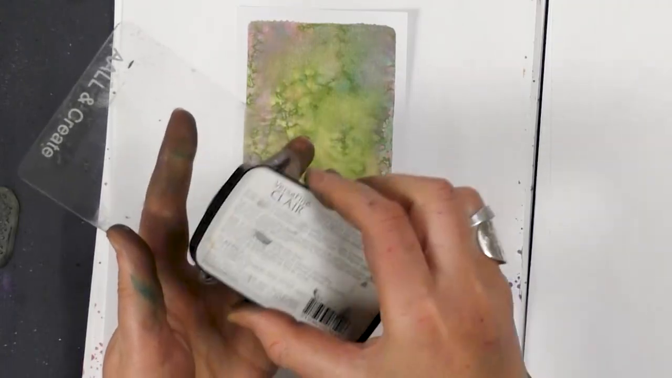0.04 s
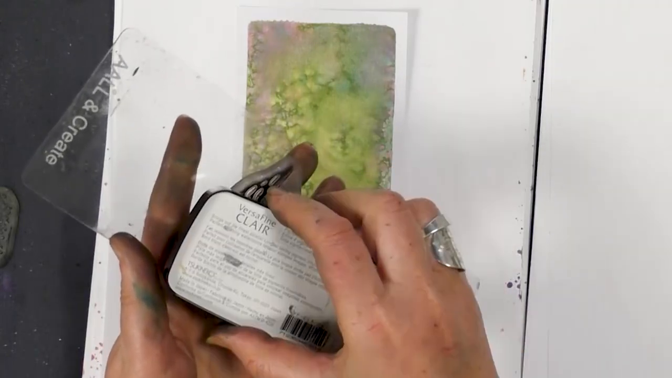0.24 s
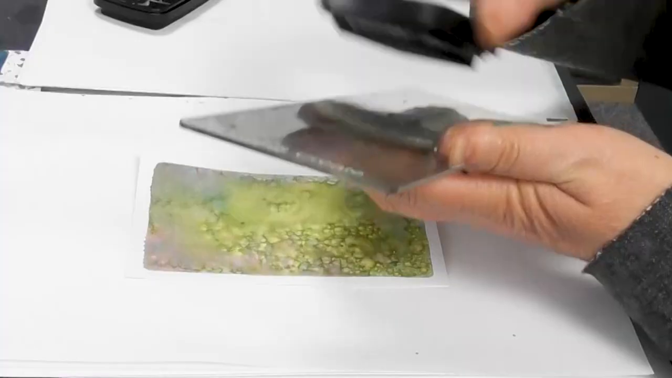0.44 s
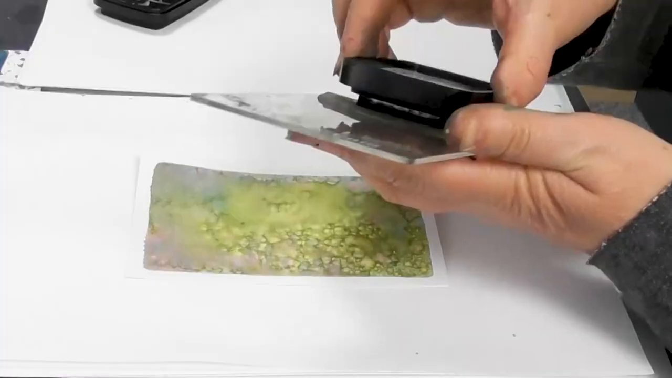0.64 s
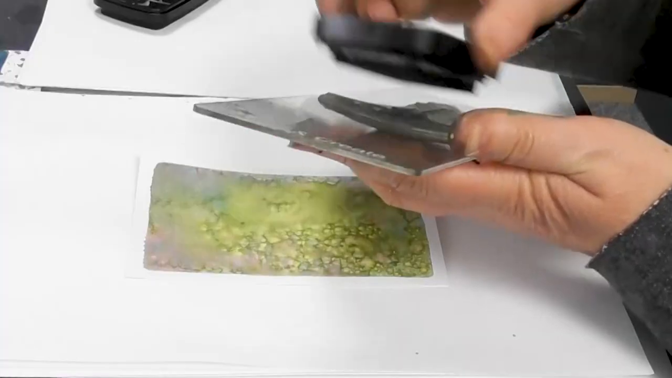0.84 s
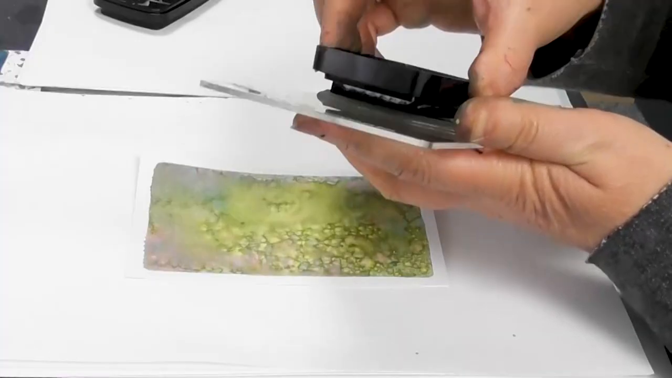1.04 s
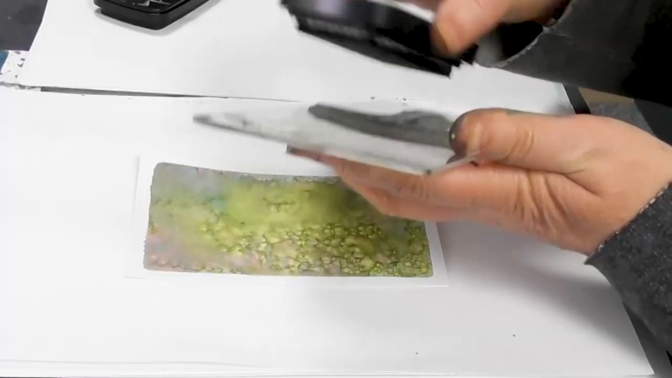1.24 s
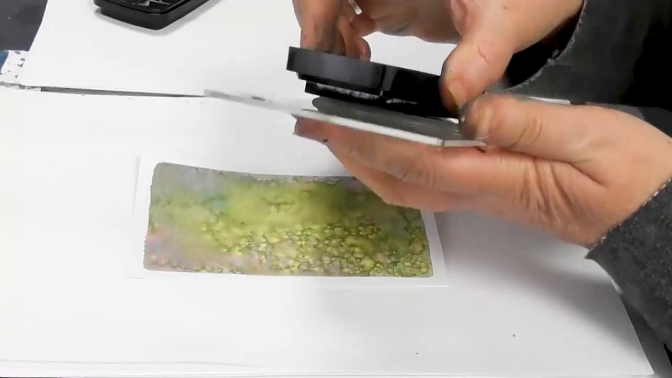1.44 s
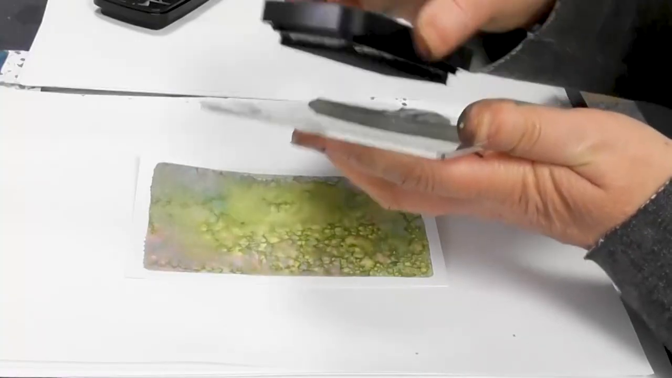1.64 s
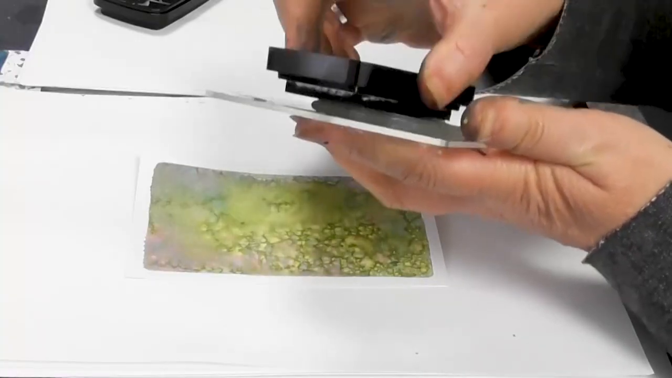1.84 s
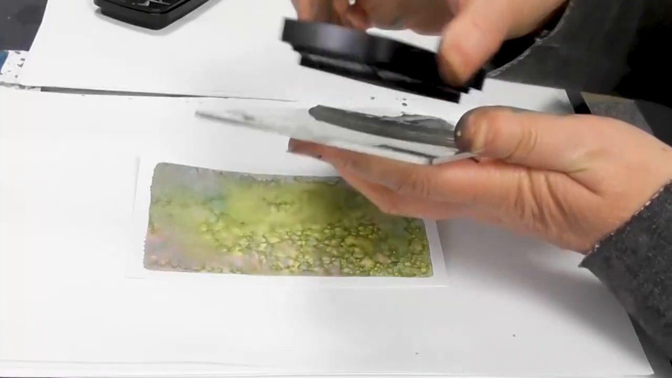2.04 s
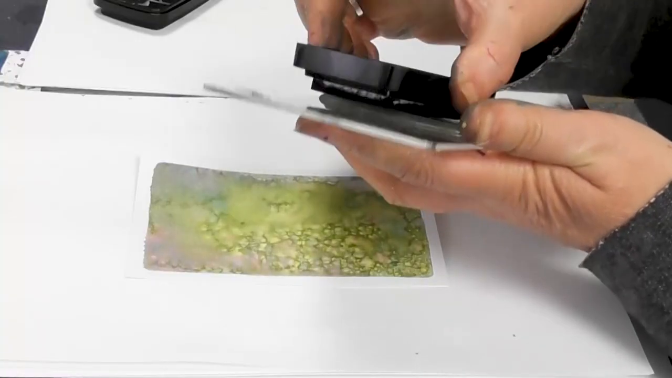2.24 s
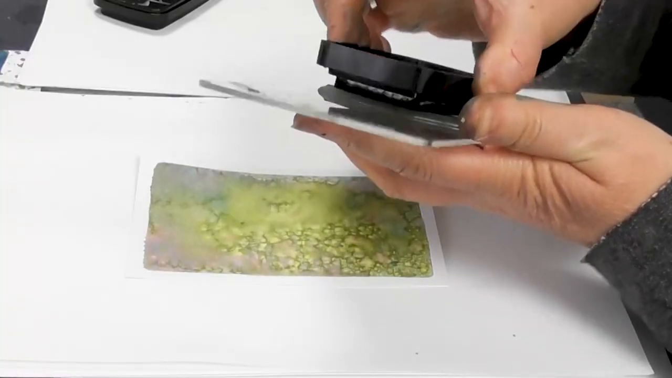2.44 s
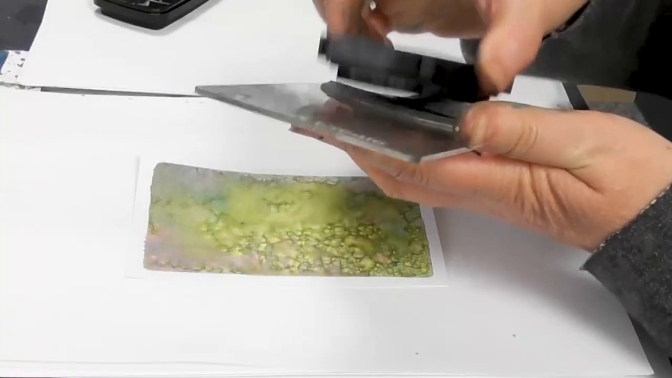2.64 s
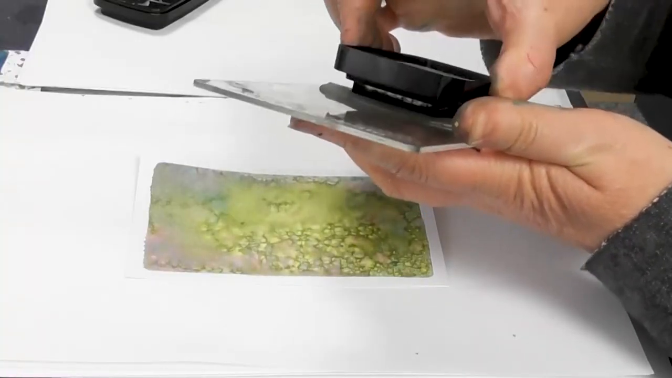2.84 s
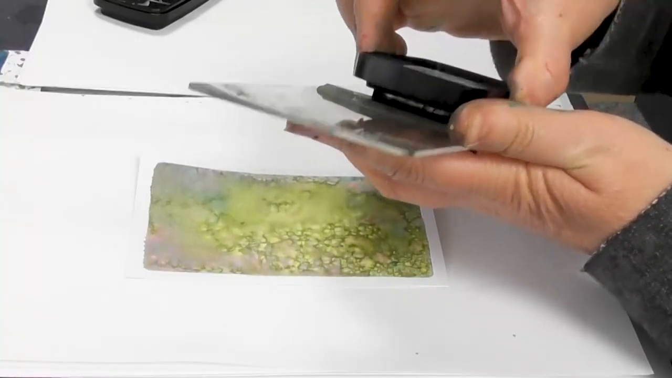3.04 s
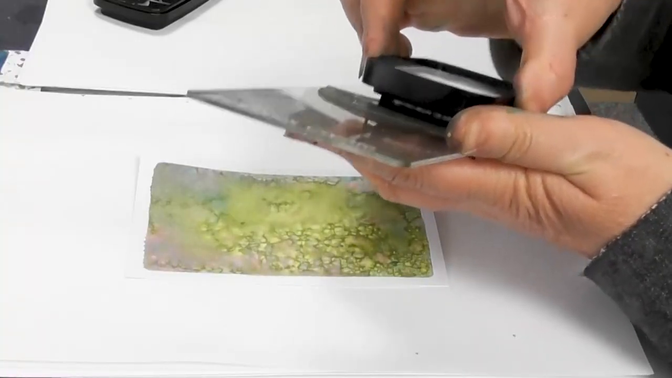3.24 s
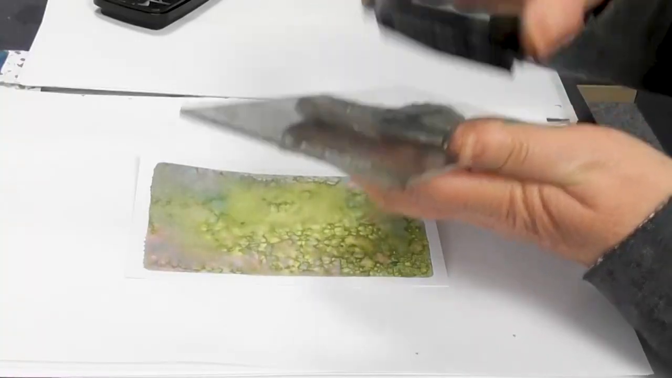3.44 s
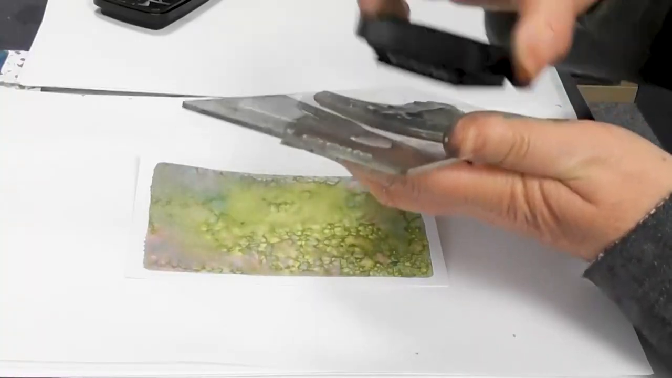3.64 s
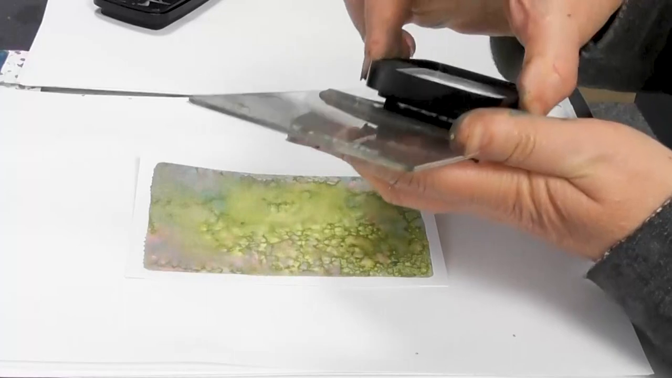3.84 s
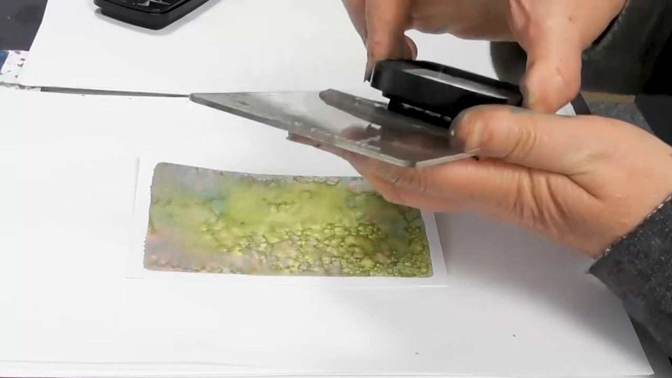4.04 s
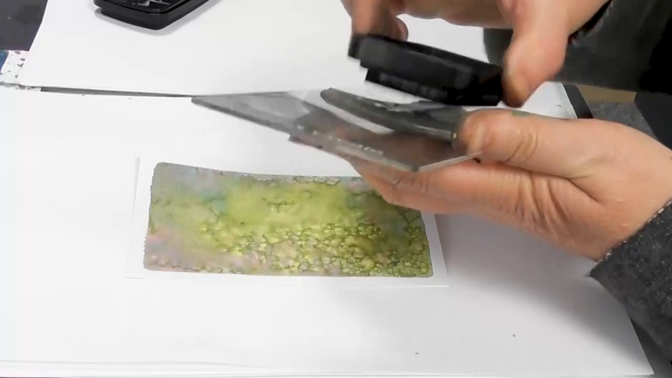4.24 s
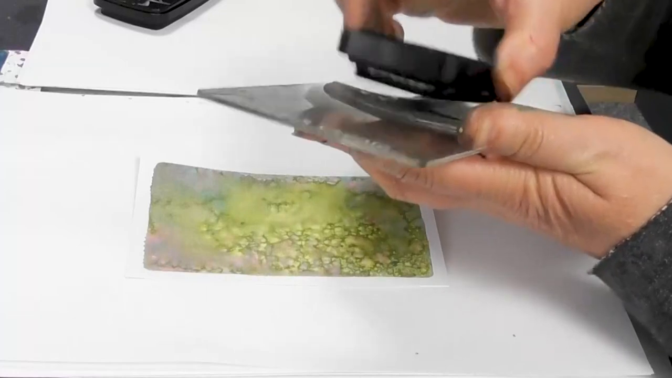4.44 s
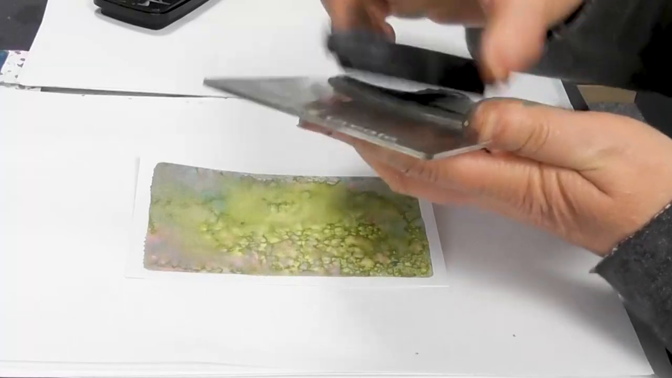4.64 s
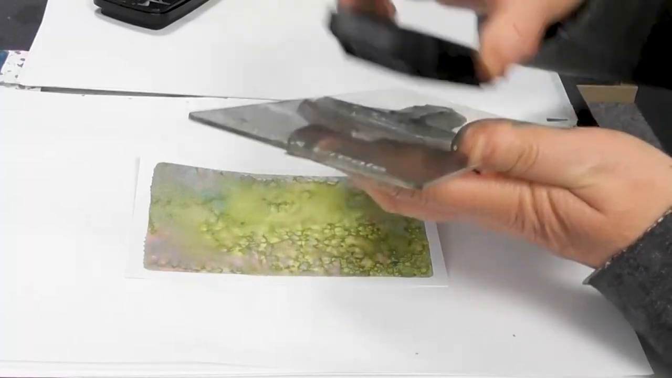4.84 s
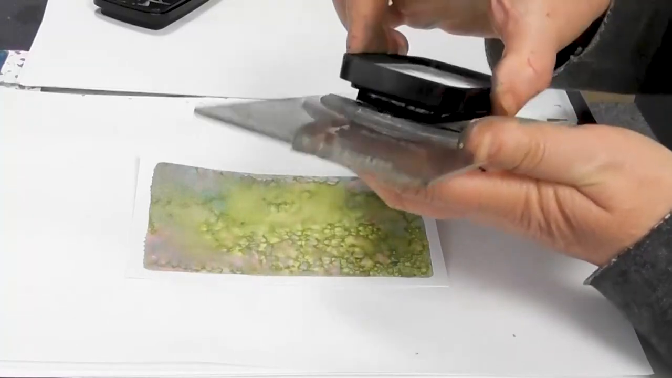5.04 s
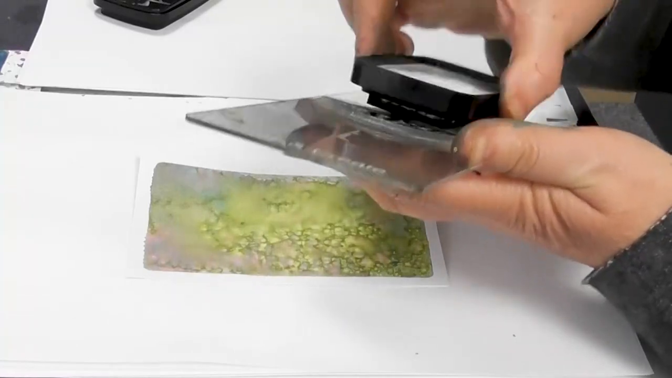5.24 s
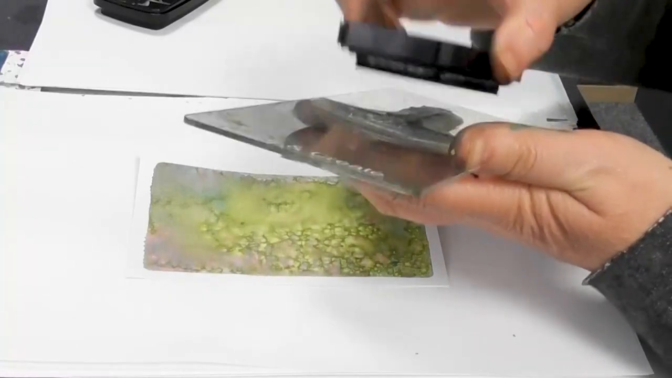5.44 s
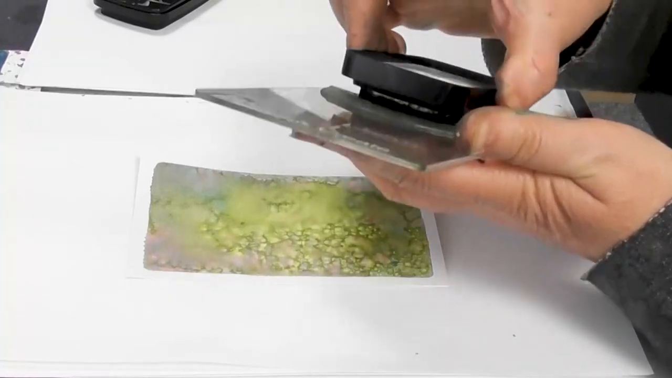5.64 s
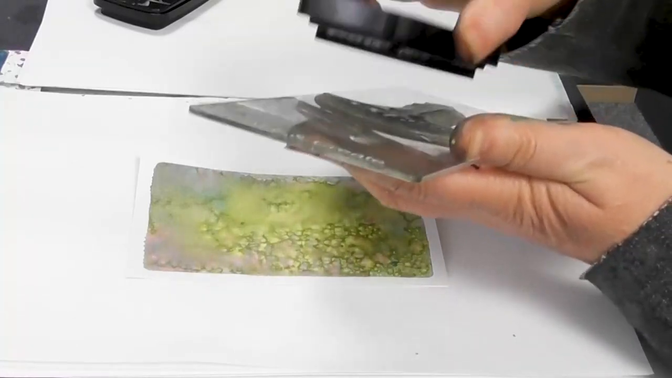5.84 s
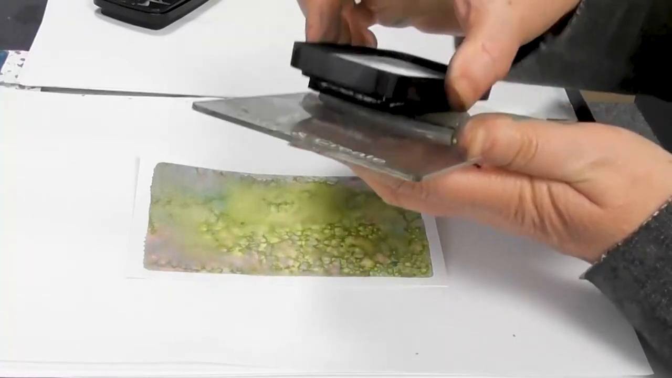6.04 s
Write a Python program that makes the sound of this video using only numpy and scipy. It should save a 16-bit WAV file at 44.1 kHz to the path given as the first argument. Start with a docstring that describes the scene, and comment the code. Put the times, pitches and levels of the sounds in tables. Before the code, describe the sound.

A plastic ink pad knocks on a hand-held rubber stamp about three times a second, with sticky crackles and small pops between dabs.

```python
"""A sticky crackle and a small pop, then clicking knocks about three times a second, with crackles between.
A plastic ink pad is being dabbed onto a rubber stamp on a hand-held acrylic plate. Each dab clicks and
knocks the plate, which the palm quiets at once; each lift peels the tacky ink and lets the rubber pop back.
A small room echoes, over a faint rumble and microphone hiss."""
import sys
import numpy as np
from scipy import signal
from scipy.fft import rfft, irfft, next_fast_len
from scipy.io import wavfile

SR = 44100
rng = np.random.default_rng(int(sys.argv[2]) if len(sys.argv) > 2 else 0)


def wav_out(sig):
    """Save sig, one row per channel (or a flat mono array), as 16-bit PCM at SR to the path in sys.argv[1]."""
    wavfile.write(sys.argv[1], SR, np.round(np.clip(np.atleast_2d(sig).T, -1, 1) * 32767).astype(np.int16))


N = 269451


def amp(db):
    """Turn decibels into a number to multiply by."""
    return 10 ** (np.asarray(db) / 20)


def unit(x):
    """Scale a sound to an average strength (rms) of 1."""
    return x / np.sqrt(np.mean(x ** 2) + 1e-20)


def along(points, hz):
    """Read between the rows of a (frequency, value) table, on a musical (log) scale."""
    frequencies, values = np.transpose(points)
    return np.interp(np.log(hz + 1), np.log(frequencies), values)


def filtered(x, response):
    """Multiply each frequency of a sound by response(hz)."""
    n = x.shape[-1]
    padded = next_fast_len(n + 8192)
    return irfft(rfft(x, padded) * response(np.fft.rfftfreq(padded, 1 / SR)), padded)[..., :n]


def coloured(x, spectrum, size=2048):
    """Give a sound a tone colour, with a filter that rings only after each hit."""
    cepstrum = irfft(np.log(amp(along(spectrum, np.fft.rfftfreq(size, 1 / SR)))))
    cepstrum[1:size // 2] *= 2
    cepstrum[size // 2 + 1:] = 0
    response = irfft(np.exp(rfft(cepstrum)))
    return signal.fftconvolve(x, response / np.linalg.norm(response))[:len(x)]


def add(track, s, sound):
    """Mix a sound into a track, starting at s seconds."""
    i = round(s * SR)
    sound, i = sound[..., max(-i, 0):max(N - i, 0)], max(i, 0)
    track[..., i:i + sound.shape[-1]] += sound


def burst(t, length_s, spectrum):
    """A cluster of tiny contacts, heard as one click; its energy is always the same."""
    bins = rfft(rng.standard_normal(len(t)) * t / length_s * np.exp(-(t / length_s) ** 2))
    flat = irfft(bins / (np.abs(bins) + 1e-9), len(t))  # all frequencies equally strong
    click = coloured(flat * np.exp(-(t / (2 * length_s)) ** 4), spectrum)
    return click / np.linalg.norm(click) * np.sqrt(SR / 500)


# how alike the left and right background are: (frequency [Hz], likeness [0 to 1])
STEREO_LIKENESS = [(30, 0.47), (100, 0.05), (400, 0.09), (2000, 1), (5000, 1), (8000, 0.96), (14000, 0.13)]
def steady_noise(spectrum):
    """Even stereo noise: both sides share the mid part and get the side part with opposite signs."""
    def response(hz):
        angle = np.arccos(np.clip(along(STEREO_LIKENESS, hz), -1, 1)) / 2
        return amp(along(spectrum, hz)) * [np.cos(angle), np.sin(angle)]
    mid, side = filtered(rng.standard_normal((2, N)), response)
    return unit(np.array([mid + side, mid - side]))


def noise_band(centre_hz, width_hz):
    """Noise so narrow that it almost has a pitch."""
    noise = rng.standard_normal(N)
    return unit(filtered(noise, lambda hz: 1 / (1 + ((hz - centre_hz) / width_hz) ** 2)))


# tone colours of the rumble and the hiss: (frequency [Hz], level [dB])
RUMBLE_COLOUR = [(20, -6), (32, -5.5), (50, 5), (80, -7), (130, -10), (250, -8), (500, -26.5), (1000, -41),
                 (2500, -37)]
HISS_COLOUR = [(300, 5.5), (800, 0), (1200, -4.5), (1650, -14), (2120, -9.5), (2800, -20), (3900, -12.5),
               (5050, -23), (6500, -13.5), (7400, -8), (8000, -7), (8700, -5), (10000, -7), (15700, -8)]
# when the faint whistle grows louder: (time [s], rise [dB])
WHISTLE_RISES = [(.8, 9), (3.621, 6)]
def background():
    """Room rumble and microphone hiss, with a high whistle that swells twice and a fainter, lower one."""
    t = np.arange(N) / SR
    rise_db = sum(db * np.exp(-((t - s) / 0.092) ** 2) for s, db in WHISTLE_RISES)
    high_whistle = amp(-67 + rise_db) * noise_band(centre_hz=7435, width_hz=156)
    low_whistle = amp(-74.5) * noise_band(centre_hz=2057, width_hz=76)
    rumble = amp(-56.5) * steady_noise(RUMBLE_COLOUR)
    hiss = amp(-57) * steady_noise(HISS_COLOUR)
    return rumble + hiss + high_whistle + low_whistle


# how long the room's echo takes to fade by 60 dB: (frequency [Hz], fade time [s])
TAIL_FADE = [(150, 0.1355), (400, 0.32), (1500, 0.32), (4100, 0.28), (12000, 0.18)]
# tone colour of that echo: (frequency [Hz], level [dB])
TAIL_COLOUR = [(60, -17), (180, -2), (340, 0), (450, 0), (560, -6), (700, 1), (1500, 0), (4000, -0.5),
               (8000, 0.5), (15000, 0)]
def echo_tail():
    """Countless echoes blur into fading noise, nearly the same on the left and right."""
    hz, t, bins = signal.stft(rng.standard_normal((2, SR // 3)), SR, nperseg=256)
    fade = amp(-60 * t / along(TAIL_FADE, hz)[:, None])
    tails = signal.istft(bins * fade, SR, nperseg=256)[1]
    tails *= 1 - np.exp(-(np.arange(tails.shape[1]) / SR / 0.00093) ** 2)  # soft start
    mid, side = filtered(tails / np.linalg.norm(tails[0]), lambda hz: amp(along(TAIL_COLOUR, hz)))
    return np.array([mid + amp(-16.5) * side, mid - amp(-9) * side])


# first echoes from desk, shelves and walls: (delay [s], strength [factor, minus flips the wave])
FIRST_ECHOES = [(.0063, -0.098), (0.009, -.04), (.0113, -.04), (.0134, .1), (.0147, .1), (.0178, 0.031),
                (.029, -.061), (.0314, 0.023), (0.034, 0.08), (.0377, 0.048)]
# notes the room hums (standing waves): (pitch [Hz], level [dB], time to fade by 60 dB [s])
ROOM_NOTES = [(166.8, -62.5, 0.21), (322.7, -71, 0.19), (376, -58, 0.24), (670, -56, 0.21),
              (732, -66, 0.22), (897, -97, 0.083), (1290, -70, 0.19)]
def room(x):
    """Near surfaces echo, the room hums on, and the tail changes as the hands move."""
    t = np.arange(SR // 3) / SR
    echoes = np.zeros(len(t))
    for delay, gain in FIRST_ECHOES:
        echoes[round(delay * SR)] += gain
    echoes = filtered(echoes, lambda hz: 1 / np.hypot(1, hz / 2500))  # echoes lose treble
    hum = sum(amp(db - 60 * t / fade_s) * np.sin(2 * np.pi * hz * t) for hz, db, fade_s in ROOM_NOTES)
    hum *= 1 - np.exp(-t / 0.037)  # takes a moment to build
    early = signal.fftconvolve(x, echoes + hum)[:N]
    late, step = np.zeros((2, N)), SR // 3
    for i in range(0, N, step):  # a new random tail every third of a second
        add(late, i / SR, signal.fftconvolve(x[None, i:i + step], echo_tail(), axes=1))
    return early + amp(-12.5) * late


# each lift of the pad off the rubber: (time [s], crackle level [dB], pop level [dB])
PAD_LIFTS = [(0.061, -41, -30), (.458, -39.5, -35), (.885, -36, -34.5), (1.255, -37, -34),
             (1.663, -41, -32.5), (2.046, -47, -40.5), (2.407, -39.5, -39.5), (2.715, -35.5, -38.5),
             (2.992, -43, -46.5), (3.008, -42.5, -39.5), (3.233, -43.5, -36.5), (3.449, -50, -43.5),
             (3.463, -45.5, -45.5), (3.971, -44.5, -34), (4.256, -40.5, -38), (4.505, -43, -41),
             (4.719, -38, -37), (5.174, -35.5, -29.5), (5.477, -39.5, -43.5), (5.822, -38, -42.5)]
# tone colour of snapping ink threads: (frequency [Hz], level [dB])
INK_COLOUR = [(200, -3), (800, 0.5), (1800, -14.5), (3000, -17), (4200, -7), (5000, -18.5), (6200, -6),
              (7100, 2.5), (7900, -1.5), (8700, 1), (10500, -4.5), (15500, -4.5)]
def ink_crackle():
    """Ink threads snap in a swelling crackle; a slower lift crackles longer and has a weaker pop."""
    track, t = np.zeros((2, N)), np.arange(-SR // 16, SR // 16) / SR
    usual_pop_db, thread_spread_db, fade_s = -37, 5, 0.014
    for s, crackle_db, pop_db in PAD_LIFTS:
        swell_s = 0.024 * amp(0.41 * (usual_pop_db - pop_db))
        tearing = amp(-20 * np.maximum(-t / swell_s, t / fade_s))
        threads = rng.standard_normal((2, len(t))) * amp(thread_spread_db * rng.standard_normal(len(t)))
        mid, side = [unit(coloured(x, INK_COLOUR)) for x in threads]
        # only the highest sounds differ between left and right
        side = amp(-13) * filtered(side, lambda hz: hz / np.hypot(hz, 8000))
        add(track, s + t[0], amp(crackle_db) * tearing * np.array([mid + side, mid - side]))
    return track


# tone colour of the hollow pop: (frequency [Hz], level [dB])
POP_COLOUR = [(90, -20.5), (260, -0.5), (470, 4.5), (750, 3), (1350, -2), (1650, -15), (3900, -21),
              (8000, -70)]
def rubber_pops():
    """At each lift the last ink thread ticks, and the freed rubber pops back, then flaps once more."""
    track, t = np.zeros(N), np.arange(SR // 25) / SR
    for s, crackle_db, pop_db in PAD_LIFTS:
        pop = amp(pop_db) * burst(t, 0.0021, POP_COLOUR)
        tick = amp(crackle_db - 3.5) * burst(t, 0.00083, INK_COLOUR)
        add(track, s, pop + tick)
        flap_delay_s = rng.uniform(0.00272, 0.0062)
        add(track, s + flap_delay_s, amp(pop_db - 10) * burst(t, 0.004, POP_COLOUR))
    return track


# tone colour of the pad's rattling case: (frequency [Hz], level [dB])
RATTLE_COLOUR = [(600, -10), (1400, 0.5), (2600, 0), (4200, 3), (5000, -7.5), (7000, -2.5), (12000, -17)]
def case_rattle(t, db):
    """The plastic case rattles briefly, in uneven grains, as it settles."""
    grain_spread_db, fade_s = 8, 0.045
    grains = rng.standard_normal(len(t)) * amp(grain_spread_db * rng.standard_normal(len(t)))
    return amp(db - 60 * t / fade_s) * unit(coloured(grains, RATTLE_COLOUR))


def plate_note(t, hz, peak_s):
    """One note of the bending plate: it swells while the soft pad presses, then dies fast."""
    t = np.maximum(t, 0)
    return np.sin(2 * np.pi * hz * t) * t / peak_s * np.exp(1 - t / peak_s)


# tone colours of the rim's dull click and bright snap, and the case's ping: (frequency [Hz], level [dB])
CLICK_COLOUR = [(300, -18.5), (900, -0.5), (1400, 4), (1700, -7.5), (2100, -2.5), (2800, -6), (3300, -6),
                (5000, -30.5)]
SNAP_COLOUR = [(4000, -4), (5000, -6), (5500, -8), (6300, -3), (7100, 0), (8000, -5), (9000, -7),
               (11000, -25), (16000, -38)]
PING_COLOUR = [(2900, -30), (3350, -15), (3600, -2), (3850, 0), (4350, -7), (4950, -22), (6000, -40)]
# how well the small plate sends sound into the air: (frequency [Hz], level [dB])
PLATE_COLOUR = [(35, -9), (85, -12), (135, -2), (220, 0), (500, -1.62), (700, 3), (950, -4), (1400, 3.5),
                (3000, 1)]
# each touch of pad on plate, two where the pad rocks; the spot it hits sets the pitches:
# (time [s], knock level [dB], knock pitch [Hz], clack level [dB], clack pitch [Hz],
#  click level [dB], snap level [dB])
PAD_DABS = [(0.2603, -10.5, 297, -18, 706, -29.5, -37), (0.6943, -8, 368.5, -18, 620, -34, -35),
            (1.0484, -7.5, 330, -33, 784, -37, -38), (1.4727, -23, 360, -17.5, 1070, -24.5, -41),
            (1.4735, -3.5, 373, -12, 832, -26.5, -31.5), (1.864, -12.5, 269.5, -24.5, 755, -41.5, -45.5),
            (2.1794, -4.5, 377, -18, 824, -38.5, -29.5), (2.5064, -18, 260, -31, 470, -44.5, -57),
            (2.5121, -9.5, 353, -46, 851, -32, -43), (2.8136, -5.5, 378, -12.5, 646, -30, -40.5),
            (3.0758, -16.5, 371, -27.5, 517, -47, -67), (3.079, -17.5, 327, -32.5, 649, -40, -73),
            (3.2908, -19, 395, -30, 874, -45.5, -79), (3.7897, -12, 286, -36, 462, -39.5, -38),
            (3.7937, -15.5, 302, -13, 558, -25.5, -33.5), (4.0954, -8, 497, -31, 930, -32, -37.5),
            (4.358, -8.5, 490, -25, 913, -33.5, -44), (4.578, -13, 386, -24.5, 1013, -41, -47),
            (4.5812, -9, 365.2, -23, 610, -31, -39), (4.9771, -10, 377, -17, 784, -29.5, -53),
            (4.981, -19, 160.4, -33, 1060, -51, -33), (5.3125, -4.5, 390, -9.5, 695, -20, -24.5),
            (5.6319, -19, 194, -25, 500, -34, -42), (5.6347, -10.5, 362, -17, 499, -39, -37.5),
            (5.9847, -7.5, 463, -23, 937, -33, -33)]
def pad_dabs():
    """The pad's plastic rim clicks and pings first; the plate's fast clack and slower knock follow."""
    track, t = np.zeros(N), np.arange(SR // 25) / SR
    rim_lead_s, clack_lag_s, knock_lag_s = 0.0005, 0.00017, 0.00068
    knock_cycles = 0.37  # the palm stops a knock of any pitch within the same part of a cycle
    plate_t = t - rim_lead_s
    for s, knock_db, knock_hz, clack_db, clack_hz, click_db, snap_db in PAD_DABS:
        knock = -amp(knock_db) * plate_note(plate_t - knock_lag_s, knock_hz, knock_cycles / knock_hz)
        clack = amp(clack_db) * plate_note(plate_t - clack_lag_s, clack_hz, peak_s=0.00089)
        # a harder hit also wakes the plate's next higher note
        overtone = amp(click_db - 2) * plate_note(plate_t, hz=1226, peak_s=0.0011)
        click = amp(click_db) * burst(t, 0.0014, CLICK_COLOUR)
        blend_db = 0.71 * click_db + 0.29 * snap_db
        ping = amp(blend_db - 3.5) * burst(t, 0.0017, PING_COLOUR)
        snap = amp(snap_db) * burst(t, 0.0015, SNAP_COLOUR)
        rattle = case_rattle(t, click_db - 12.5)
        add(track, s - rim_lead_s, knock + clack + overtone + click + ping + snap + rattle)
    return coloured(track, PLATE_COLOUR)


# how much louder the left side is than the right: (frequency [Hz], level [dB])
LEFT_LOUDER = [(50, 1.8), (170, 4.4), (350, 2.6), (700, .9), (2000, .2), (5000, -.3), (12000, -1.1)]
# how far the left wave runs ahead of the right: (frequency [Hz], phase [radians])
LEFT_AHEAD = [(0, 0), (340, -0.27), (1720, -0.18), (8270, -0.0), (10200, 0.2), (11400, 0.0),
              (16000, -0.096)]
def microphones(hz):
    """Two close microphone openings hear each frequency at a slightly different level and moment."""
    halves = [.5, -.5]  # left, right
    gain = amp(np.outer(halves, along(LEFT_LOUDER, hz)))
    return gain * np.exp(1j * np.outer(halves, along(LEFT_AHEAD, hz)))


def scene():
    """Dabs and lifts in the small room, heard in stereo."""
    inking = pad_dabs() + ink_crackle() + rubber_pops()
    sound = inking + room(inking.mean(axis=0)) + background()
    return filtered(sound, microphones)


def record(dry):
    """The very highest treble is cut off steeply."""
    top_hz = 16000
    return filtered(dry, lambda hz: 1 / np.sqrt(1 + (hz / top_hz) ** 200))


dry = scene()
out = record(dry)
wav_out(out)
```